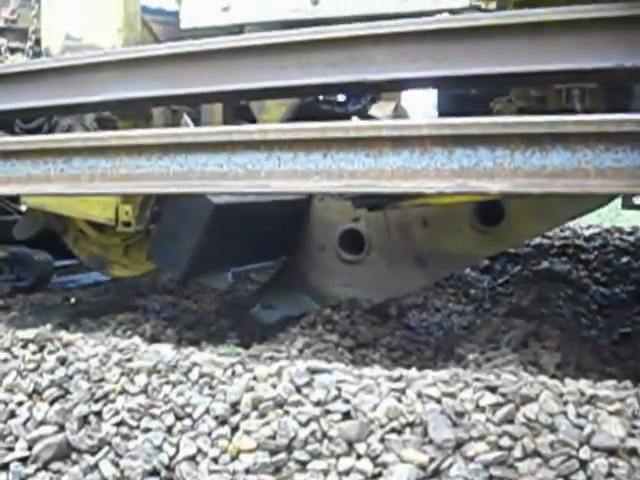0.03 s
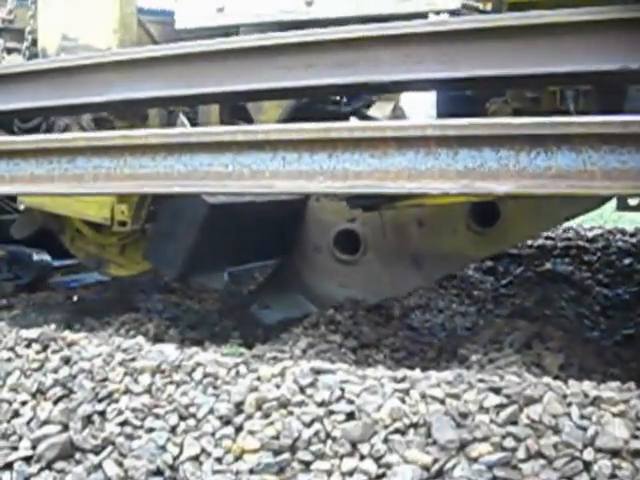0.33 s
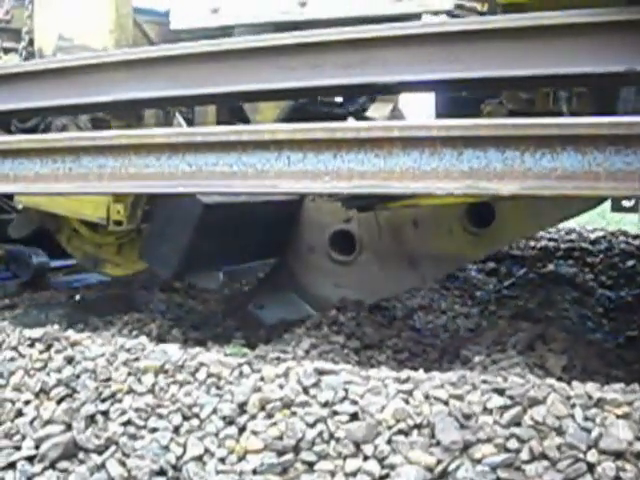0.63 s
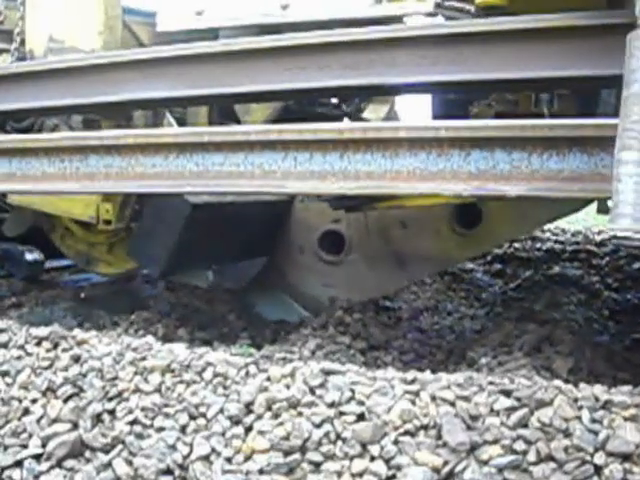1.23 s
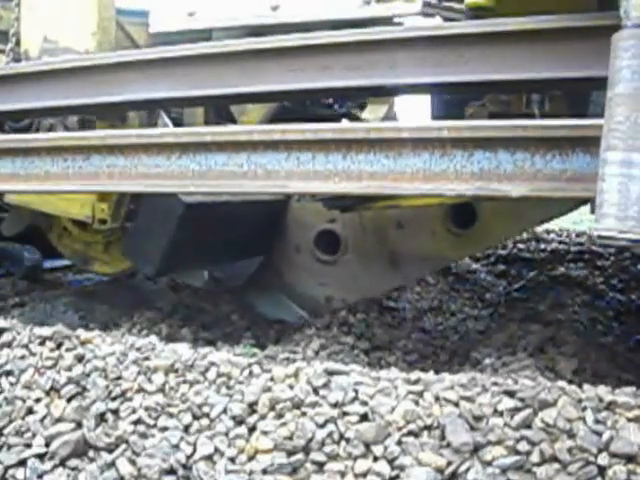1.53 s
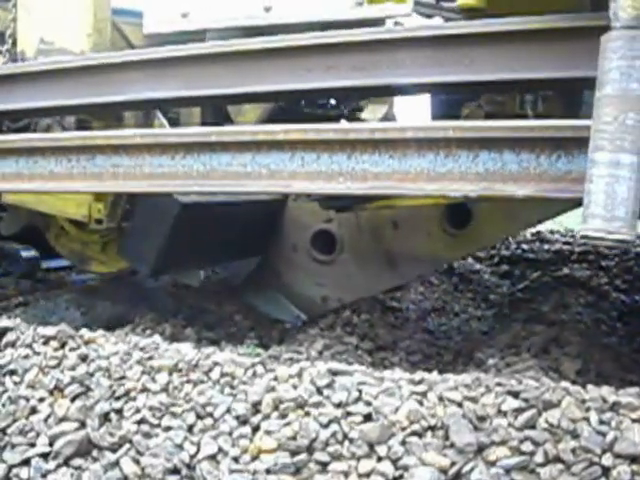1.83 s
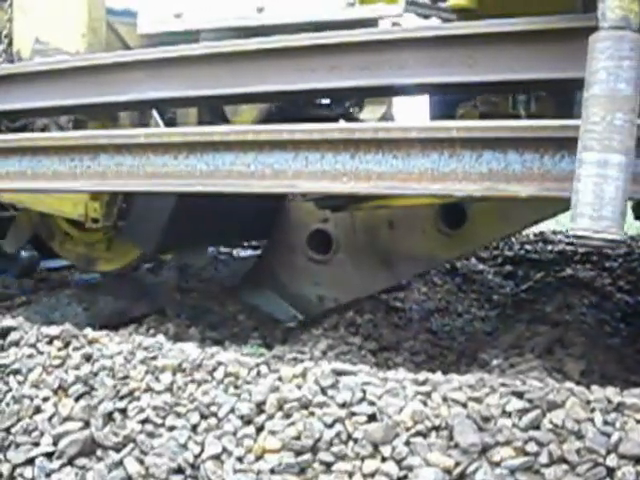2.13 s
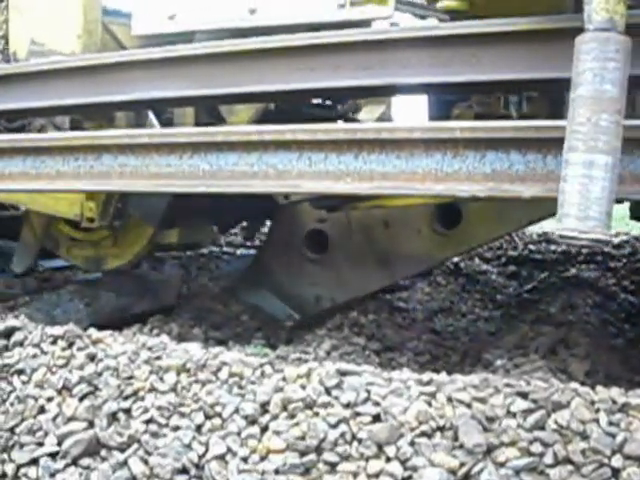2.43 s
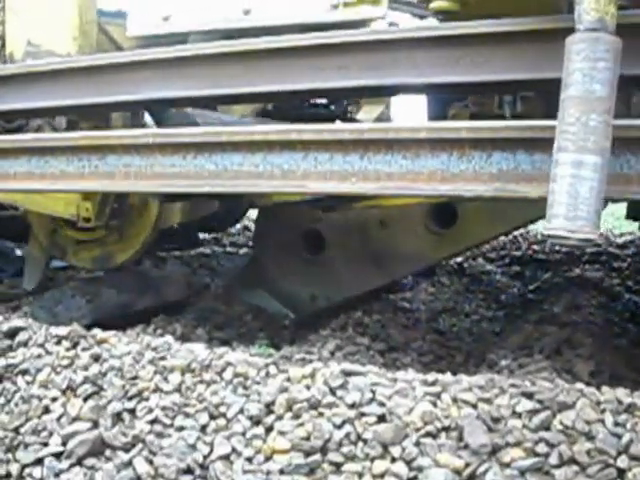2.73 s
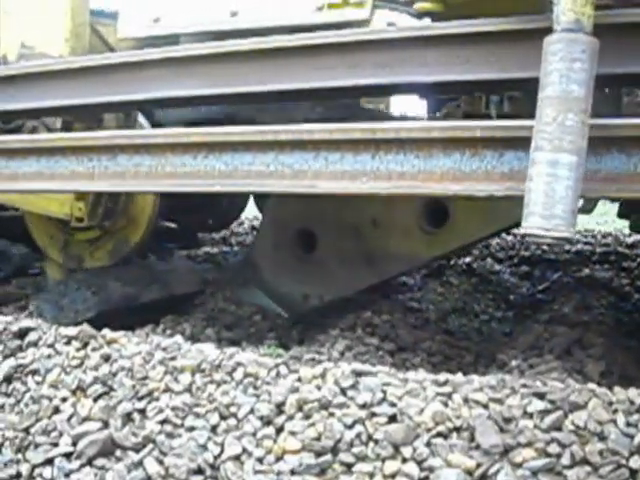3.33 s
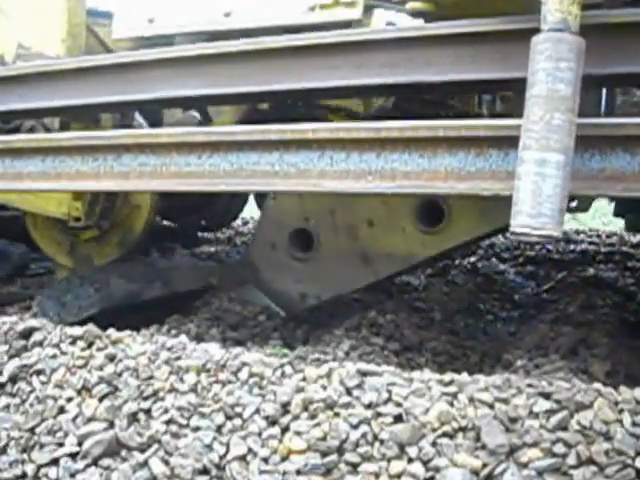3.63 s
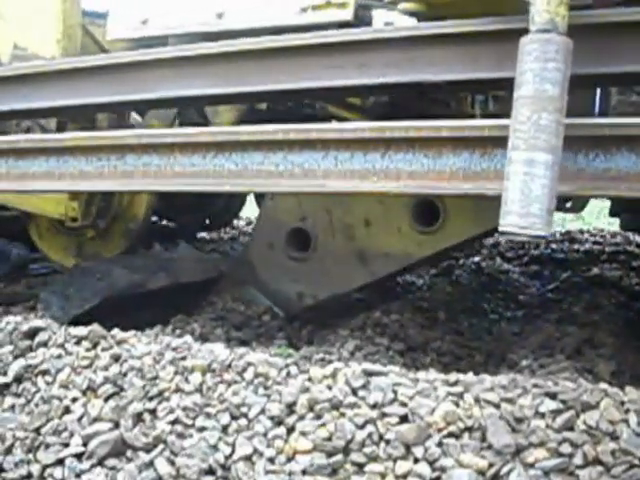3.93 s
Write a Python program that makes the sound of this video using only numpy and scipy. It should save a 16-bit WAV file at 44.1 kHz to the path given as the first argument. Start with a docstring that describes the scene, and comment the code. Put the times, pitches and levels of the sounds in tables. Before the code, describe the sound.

Rumbling diesel track machine ploughing through gravel, stones knocking and scraping against its steel plates.

```python
"""A track renewal machine creeps past at arm's length, its diesel droning under a steady roar.
Its steel plough grinds through the ballast: friction makes the stones rumble and hiss, impacts knock
on the plates, jammed stones crunch or groan by stick-slip, and the frame rings on in its modes.
A small camera with a narrow band hears it and saturates on the hardest blows."""
import sys
import numpy as np
from scipy import signal
from scipy.fft import rfft, irfft
from scipy.io import wavfile
from scipy.ndimage import uniform_filter1d

SR = 44100
rng = np.random.default_rng(int(sys.argv[2]) if len(sys.argv) > 2 else 0)


def wav_out(sig):
    """Save sig, one row per channel (or a flat mono array), as 16-bit PCM at SR to the path in sys.argv[1]."""
    wavfile.write(sys.argv[1], SR, np.round(np.clip(np.atleast_2d(sig).T, -1, 1) * 32767).astype(np.int16))


N = 176400
BLOW_SAMPLES, FILTER_SAMPLES = 12288, 8192


def undb(db):
    """The decibel scale is logarithmic: 20 dB is a factor of ten in amplitude."""
    return 10 ** (np.asarray(db) / 20)


def unit(x):
    """Normalisation to an rms of 1."""
    return x / np.sqrt(np.mean(x ** 2) + 1e-18)


def curve(rows):
    """A gain envelope, interpolated in decibels between (seconds, dB) rows."""
    return undb(np.interp(np.arange(N) / SR, *np.array(rows).T))


def walk(per_s):
    """Random modulation: smoothed random steps, with an rms of 1."""
    step = int(SR / per_s)
    stairs = np.repeat(rng.standard_normal(N // step + 1), step)
    return unit(uniform_filter1d(uniform_filter1d(stairs, step), step)[:N])


def grains(spread_db, size=N, per_s=8000):
    """Shot noise: dense random contacts give many small clicks and a few larger ones."""
    strength = undb(spread_db * np.minimum(rng.exponential(size=size), 4))
    contacts = rng.random(size) < per_s / SR
    polarity = np.sign(rng.random(size) - .5)
    return unit(contacts * polarity * strength)


# Narrow resonances of the frame. Each row: frequency in Hz, lift in dB.
FRAME_RESONANCES = [(411, 3), (570, 2), (934, -2), (1593, -2), (2142, 3.5), (2626, 5), (3206, 1.5)]

def colour(x, spectrum, focus_hz=500, focus_db=0):
    """Source and filter: a spectrum, a broad focus band and the frame's resonances shape x; rms 1."""
    focus_half_width_oct, frame_half_width_hz = 0.22, 12
    row_hz, row_db = np.array(spectrum, float).T
    half = FILTER_SAMPLES // 2
    hz = np.maximum(np.arange(half + 1) * SR / FILTER_SAMPLES, 1)
    db = np.interp(np.log(hz), np.log(row_hz), row_db)
    db += focus_db / (1 + (np.log2(hz / focus_hz) / focus_half_width_oct) ** 2)
    for mode_hz, lift_db in FRAME_RESONANCES:
        db += lift_db / (1 + ((hz - mode_hz) / frame_half_width_hz) ** 2)
    cepstrum = irfft(np.log(undb(db)))[:half]
    cepstrum[1:] *= 2  # folding makes the filter causal and minimum-phase
    response = irfft(np.exp(rfft(cepstrum, FILTER_SAMPLES)))[:half]
    return unit(irfft(rfft(x) * rfft(response, len(x)), len(x)))


def burst(attack_s, hold_s, decay_s):
    """A damped transient: linear rise, then exponential decay from hold_s after the onset."""
    t = np.arange(BLOW_SAMPLES) / SR
    return np.minimum(t / attack_s, 1) * np.exp(-np.maximum(t - hold_s, 0) / decay_s)


def blow(sound, envelope, db):
    """Energy normalisation: the shaped sound has about the given rms level where its envelope is 1."""
    shaped = sound * envelope
    return undb(db) * shaped * np.sqrt(np.sum(envelope ** 2) / np.sum(shaped ** 2))


def add(out, start_s, sound):
    """Superposition: a sound adds to the mix from its start time."""
    first = int(start_s * SR)
    out[first:first + len(sound)] += sound[:max(N - first, 0)]


# Harmonics of the diesel. Each row: multiple of the shaft rate, relative level in dB.
SHAFT_ORDERS = [(1, -35.5), (3, -20.5), (5, -34.5), (6, -34)]
# Swell of the drone and the hum together. Each row: time in seconds, gain in dB.
DRONE_GAIN = [(0, 2), (.8, 2.5), (1.2, -0.5), (2.3, -0.5), (3.7, -2.5), (4, -4)]
# Spectrum of the machinery's roar. Each row: frequency in Hz, relative spectral density in dB.
ROAR_SPECTRUM = [(15, -3.5), (35, 0.5), (140, -2.5), (200, -2.5), (270, -8.5), (400, -10.5), (520, -8.5),
                 (620, -9), (780, -13), (960, -10), (1250, -21), (1600, -25.5), (2300, -19.5),
                 (3300, -25.5), (4200, -27), (5200, -46)]
# Strength of the roar. Each row: time in seconds, level in dB.
ROAR_LEVEL = [(0, -20.5), (.9, -18.5), (1.25, -22.5), (2.6, -23), (3.3, -21.5), (3.65, -25.5), (4, -23.5)]

def machine():
    """Rotation gives shaft harmonics and a second drive's hum; firings modulate the roar's amplitude."""
    shaft_hz, hum_hz, hum_db = 25.17, 102.9, -27.5
    firing_depth, flutter_db = .18, 1.5
    shaft_angle = 2 * np.pi * np.cumsum(shaft_hz * (1 + 0.0036 * walk(2.7))) / SR
    drone = np.zeros(N)
    for order, db in SHAFT_ORDERS:
        drone += undb(db + 0.52 * walk(7)) * np.sin(order * shaft_angle + 2 * np.pi * rng.random())
    hum_gain = undb(hum_db + 0.91 * walk(2.7))
    hum = hum_gain * np.sin(2 * np.pi * np.cumsum(hum_hz * (1 + 0.0063 * walk(6))) / SR)
    firing = 1 + firing_depth * np.sin(3 * shaft_angle)  # three firings a turn
    roar = colour(grains(spread_db=2.0) * firing * undb(flutter_db * walk(35)), ROAR_SPECTRUM)
    return np.sqrt(2) * (drone + hum) * curve(DRONE_GAIN) + roar * curve(ROAR_LEVEL)


# Spectra of the plates' rumble and the sliding stones' hiss.
# Each row: frequency in Hz, relative spectral density in dB.
RUMBLE_SPECTRUM = [(40, -6.5), (80, 1.5), (140, 0.5), (200, -5), (290, -2), (420, -1.5), (560, 0),
                   (740, -3), (950, -3), (1250, -19), (2000, -29.5), (4400, -38.5)]
HISS_SPECTRUM = [(400, -12), (1200, -8), (1700, -2.5), (2500, 0), (3400, 1.5), (4400, -6.5), (6000, -31.5)]
# Strength of the rumble and of the hiss. Each row: time in seconds, level in dB.
RUMBLE_LEVEL = [(0, -26), (.25, -27), (.44, -19), (.52, -13), (.6, -18), (.76, -9.5), (.94, -12),
                (1.06, -14), (1.2, -28), (1.55, -21), (1.9, -23), (2.03, -29.5), (2.4, -27.5),
                (2.55, -44.5), (3.7, -36), (4, -28.5)]
HISS_LEVEL = [(0, -36), (.44, -40.5), (.49, -23), (.57, -24.5), (.65, -17.5), (.7, -21), (.735, -17),
              (.85, -31), (.92, -22), (1.0, -31), (1.07, -29), (1.15, -51.5), (1.3, -42), (1.58, -26.5),
              (1.77, -31.5), (1.83, -29), (1.94, -27.5), (2.03, -43.5), (4, -44)]

def plough():
    """Sliding friction: ballast rumbles against the plates and hisses along the steel in small jerks."""
    rumble = colour(grains(spread_db=0.5) * undb(1.6 * walk(45)), RUMBLE_SPECTRUM)
    hiss = colour(grains(spread_db=1.5) * undb(0.75 * walk(60)), HISS_SPECTRUM)
    return rumble * curve(RUMBLE_LEVEL) + hiss * curve(HISS_LEVEL)


# Spectrum of the struck plates. Each row: frequency in Hz, relative spectral density in dB.
PLATE_SPECTRUM = [(50, -14.5), (130, -5), (420, 2), (560, 0.5), (800, 0.5), (1050, -3), (1300, -17.5),
                  (2200, -17.5), (3300, -18), (4400, -25.5)]
# Stones striking the plates. Each row: start in seconds, level in dB, centre of the focus band in Hz,
# its lift in dB, hold in seconds, decay time constant in seconds.
KNOCKS = [(.287, -12.5, 141, 24.5, 0.014, 0.024), (0.31, -14.5, 230, 7, 0.02, .02),
          (0.847, -14, 125, 30.5, 0.016, 0.048), (1.004, -9, 400, 6, 0.027, 0.032),
          (1.437, -16, 345, 11, .02, .025), (1.596, -14, 850, 15.5, .01, .015),
          (1.64, -5, 487, 9.5, 0.028, 0.014), (1.679, -8.5, 455, 21, 0.031, 0.025),
          (1.701, -11, 660, 4, 0.0063, 0.016), (1.868, -16, 850, -0.5, .03, 0.024),
          (1.968, -21.5, 640, 4, 0.006, 0.031), (2.332, -20, 620, 2.5, 0.012, 0.015),
          (2.386, -19.5, 550, -6, 0.0082, 0.022), (3.103, -10.5, 610, 2.5, 0.018, 0.06),
          (3.108, -10, 252, 14, 0.01, 0.015), (3.201, -2.5, 604, 2.5, .035, 0.015),
          (3.25, -5, 570, 7, 0.014, 0.023), (3.509, -15.5, 600, 0.5, 0.013, 0.015),
          (3.543, -13, 545, 11.5, 0.033, 0.02), (3.714, -13.5, 557, 3.5, 0.024, .035),
          (3.765, -11, 540, 7, 0.021, 0.019), (3.806, -10.5, 526, 10, .008, 0.058),
          (3.846, -9.5, 530, 10, 0.017, .024), (3.945, -24.5, 457, 9, .025, 0.048)]

def knocks(attack_s=0.0026):
    """Impact excitation: a clatter drives the plates' dense resonances, usually favouring one band."""
    out = np.zeros(N)
    for start_s, db, focus_hz, focus_db, hold_s, decay_s in KNOCKS:
        clatter = colour(grains(spread_db=1, size=BLOW_SAMPLES), PLATE_SPECTRUM, focus_hz, focus_db)
        add(out, start_s, blow(clatter, burst(attack_s, hold_s, decay_s), db))
    return out


# Spectrum of cracking stone. Each row: frequency in Hz, relative spectral density in dB.
STONE_SPECTRUM = [(150, -9.5), (500, -1.5), (1050, 2.5), (1300, -1), (2700, 2), (4400, -2.5), (6000, -28)]
# Stones cracking. Each row: start in seconds, level in dB, hold and decay time constant in seconds.
CRUNCHES = [(0.315, -27.5, .015, .025), (0.724, -19, 0.01, 0.019), (1.022, -29.5, .008, 0.019),
            (1.359, -27, 0.016, 0.025), (1.614, -15, .012, 0.032), (1.638, -9.5, 0.0074, 0.011),
            (1.654, -8, 0.0049, 0.0028), (2.323, -22, .016, 0.0083), (2.365, -24.5, 0.0091, 0.012),
            (3.107, -22.5, 0.0084, 0.017), (3.208, -4.5, 0.019, .003), (3.231, -2, 0.0033, .002),
            (3.262, -5.5, 0.0033, 0.012), (3.321, -21, 0.011, 0.038), (3.415, -20.5, 0.024, 0.016),
            (3.522, -7.5, 0.017, 0.022), (3.769, -29.5, .05, .06)]

def crunches(attack_s=0.0018):
    """Brittle fracture: jammed stones give way in bright bursts of clicks."""
    out = np.zeros(N)
    for start_s, db, hold_s, decay_s in CRUNCHES:
        clicks = colour(grains(spread_db=1, size=BLOW_SAMPLES), STONE_SPECTRUM)
        add(out, start_s, blow(clicks, burst(attack_s, hold_s, decay_s), db))
    return out


# Jammed stones groaning on the steel. Each row: start in seconds, length in seconds, level in dB,
# first and last frequency in Hz, roughness from 0 to 1.
GROANS = [(0.491, 0.091, -17, 489, 407, 0.97), (.54, 0.16, -14.5, 415, 410, 0),
          (.735, 0.064, -17, 906, 960, 0.09), (0.946, .105, -11, 422.3, 595, .45),
          (1.625, 0.073, -7.5, 457.6, 416.6, .35), (1.785, 0.067, -15, 567, 377, 0.96)]

def groans(jitter=0.091, shimmer_db=5.5, slips_per_s=140):
    """Stick-slip oscillation: a jammed stone gives a short rough tone that glides as the load changes."""
    out = np.zeros(N)
    for start_s, length_s, db, first_hz, last_hz, roughness in GROANS:
        n = int(length_s * SR)
        hz = np.linspace(first_hz, last_hz, n) * (1 + roughness * jitter * walk(slips_per_s)[:n])
        shimmer = undb(roughness * shimmer_db * walk(slips_per_s)[:n])
        tone = shimmer * np.sin(2 * np.pi * np.cumsum(hz) / SR)
        swell = np.sin(np.linspace(0, np.pi, n))
        add(out, start_s, blow(tone, swell, db))
    return out


# Modes of the steel frame. Each row: frequency in Hz, relative level in dB, 60 dB decay time in seconds.
STEEL_MODES = [(386, 1, .5), (796, 3.5, 0.38), (804, -9.5, 1.4)]
# Contacts that set it ringing. Each row: start in seconds, gains of the low and the high modes in dB.
RINGS = [(1.07, -22, -20), (1.678, -10, -10), (2.39, -21, -38)]

def steel_rings(split_hz=600, attack_s=0.013):
    """Damped free vibration: a few modes of the frame ring on after heavy contacts."""
    t, out = np.arange(BLOW_SAMPLES) / SR, np.zeros(N)
    for start_s, low_db, high_db in RINGS:
        for hz, db, t60 in STEEL_MODES:
            waver_db = 1.9 * walk(per_s=110)[:BLOW_SAMPLES]  # rubbing stones disturb the ring
            strength = undb(db + waver_db + (low_db if hz < split_hz else high_db))
            envelope = burst(attack_s, hold_s=attack_s, decay_s=t60 / np.log(1000))
            add(out, start_s, strength * envelope * np.sin(2 * np.pi * hz * t))
    return out


def scene():
    """Superposition: all the sources at the trackside sum in one channel."""
    return (machine() + plough() + knocks() + crunches() + groans() + steel_rings())[None]


def record(dry):
    """Saturation and band limiting: the camera rounds the peaks, loses treble and clips what overloads."""
    headroom, knee, ceiling = 1.64, 0.89, 0.99  # amplitudes
    mic_top_hz, band_top_hz, output_top_hz = 3863, 4750, 15900
    rounded = headroom * np.tanh(dry / headroom)
    dulled = signal.sosfilt(signal.butter(6, mic_top_hz, fs=SR, output="sos"), rounded)
    narrow = signal.sosfilt(signal.cheby1(12, .2, band_top_hz, fs=SR, output="sos"), dulled)
    linear = np.clip(narrow, -knee, knee)
    margin = ceiling - knee
    clipped = linear + margin * np.tanh((narrow - linear) / margin)
    return signal.sosfilt(signal.ellip(8, .2, 70, output_top_hz, fs=SR, output="sos"), clipped)


dry = scene()
out = record(dry)
wav_out(out)
```